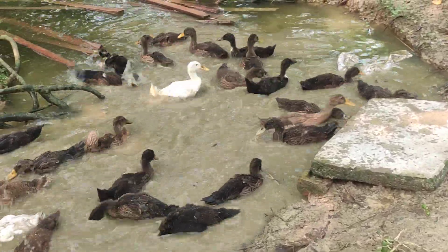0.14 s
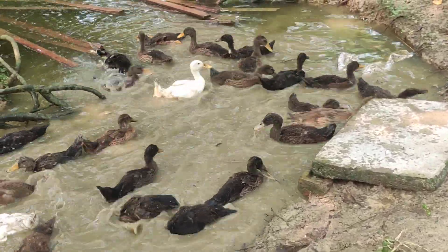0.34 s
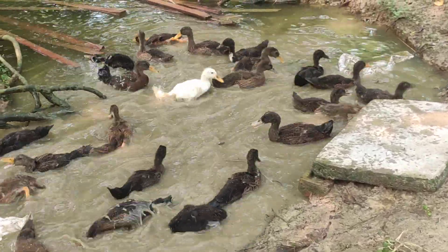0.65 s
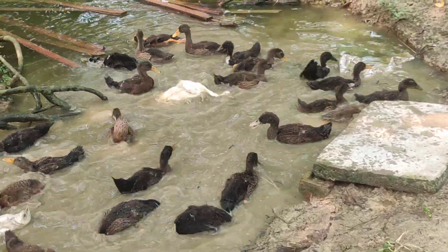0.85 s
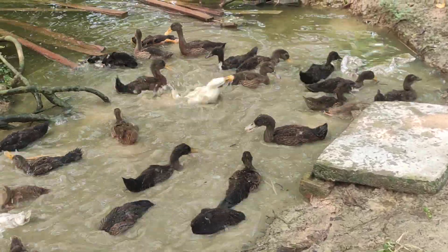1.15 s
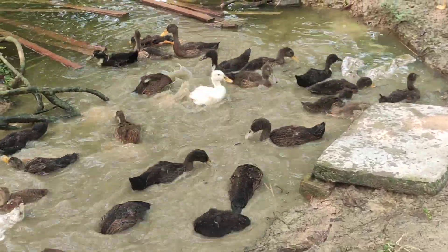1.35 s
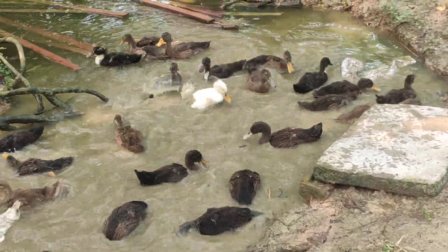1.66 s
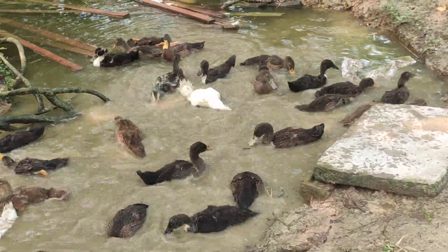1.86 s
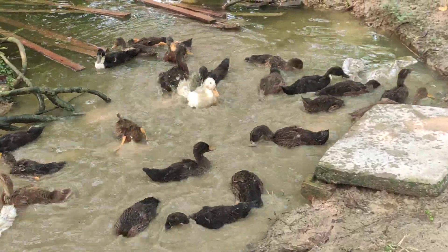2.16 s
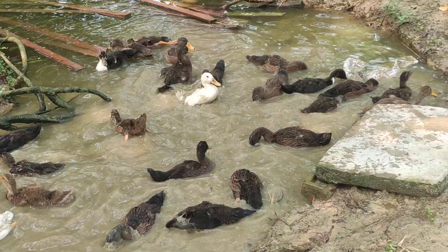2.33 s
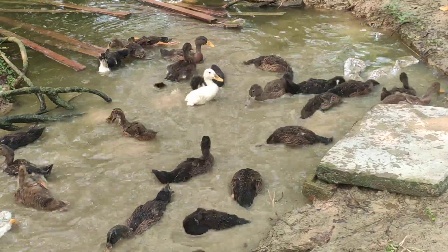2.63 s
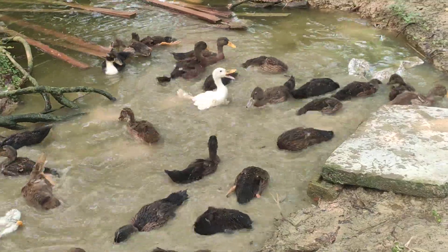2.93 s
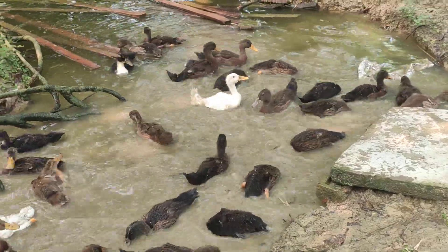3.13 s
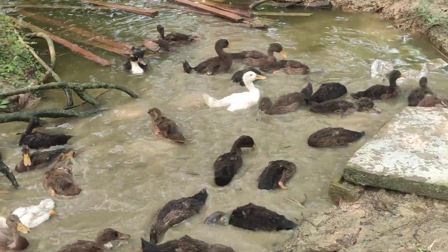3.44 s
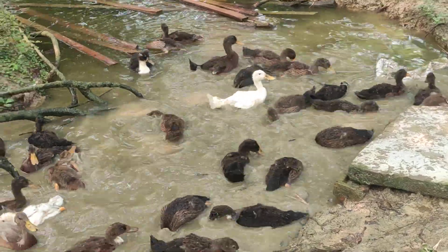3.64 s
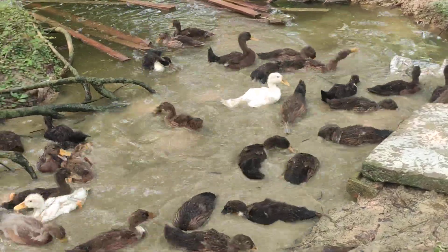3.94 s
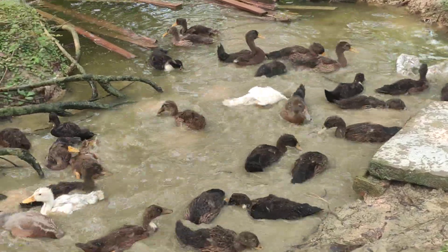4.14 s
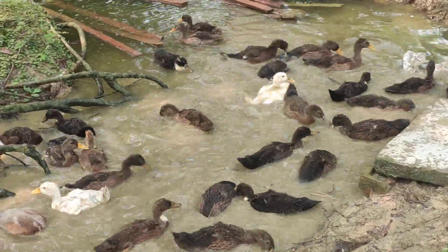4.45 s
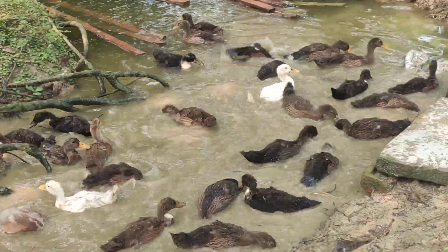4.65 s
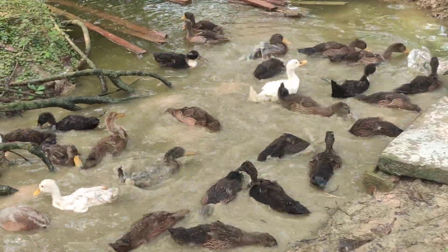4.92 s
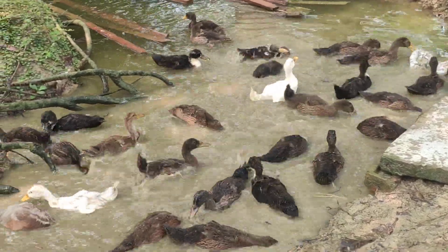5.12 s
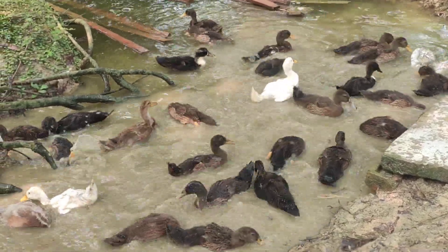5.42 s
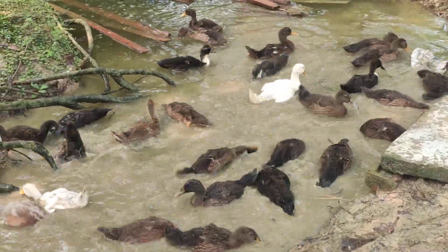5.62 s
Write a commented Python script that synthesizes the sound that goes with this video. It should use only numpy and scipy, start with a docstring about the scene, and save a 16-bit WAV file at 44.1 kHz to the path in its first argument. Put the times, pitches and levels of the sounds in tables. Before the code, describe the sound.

Ducks feed in a shallow muddy stream close to a stereo microphone. From the start, bright droplet ticks and bill clicks, short round plops and gurgles crowd together over a light, fizzy rush of water. A splash comes at 0.1 s, a dense flurry with the sharpest crack around 0.65-1.0 s, a brief lull near 1.2-1.5 s, then strong slaps and deep plops at 1.75-2.4 s. After 3 s the water is calmer, with scattered ticks, small slaps and single bubbles to the end, including a clear plop near 5.7 s. Tiny high peeps of young birds sound at 0.02, 1.4 and 2.7 s, bunch at 3.4-3.9 s, and bend upward and down at 4.3-4.7 s. Far off, a one-cylinder motorbike begins about 1 s, revs, is strongest near 2.1 s, fades around 3 s and swells after 5 s, over low traffic rumble and a faint fading hum. The left channel is brighter and more ringing.

```python
"""A shallow muddy stream where ducks dabble close by: short glides make droplet ticks and bubbles, shaped
noise makes slaps and fizz, curved whistles make young birds' peeps. Far off a one-cylinder motorbike, a stack
of firing orders, revs and drives on over a wavering, slowly fading hum and a low noise rumble.
Two microphone ports lie a hand apart; the left one sits in a cavity that rings in the treble."""
import sys
import numpy as np
from scipy import signal
from scipy.fft import rfft, irfft, next_fast_len
from scipy.io import wavfile
from scipy.ndimage import uniform_filter1d, map_coordinates

SR = 44100
rng = np.random.default_rng(int(sys.argv[2]) if len(sys.argv) > 2 else 0)


def store_pcm(level_fs):
    """Save levels as 16-bit WAV."""
    pcm = np.round(np.clip(level_fs, -1, 1) * 32767).astype(np.int16)
    wavfile.write(sys.argv[1], SR, np.atleast_2d(pcm).T)


N = 254898

# Stirring of the water. Each row: time in seconds, spray level in dB, gurgle level in dB, both before surges.
STIRRING = [(0.0, -51, -45), (0.1, -42, -47.5), (0.3, -45, -47.5), (0.42, -49, -53), (0.6, -46.5, -49),
            (0.7, -43.5, -45.5), (0.95, -43.5, -41.5), (1.15, -49, -52.5), (1.5, -51, -53),
            (1.75, -44, -44), (1.9, -45, -47.5), (2.2, -44.5, -43), (2.33, -44, -44), (2.7, -47, -50.5),
            (3.0, -57, -61.5), (3.3, -50.5, -53), (3.8, -54.5, -57.5), (4.2, -51, -58), (4.7, -53, -57),
            (5.0, -50.5, -57), (5.78, -52, -56)]


def amp(db):
    """Gain of a level in dB."""
    return 10 ** (np.asarray(db) / 20)


def unit(x):
    """x brought to rms 1."""
    return x / np.sqrt(np.mean(x ** 2) + 1e-20)


def along(points, hz):
    """(Hz, value) points interpolated on a log frequency axis."""
    point_hz, value = np.transpose(points)
    return np.interp(np.log(hz + 1), np.log(point_hz + 1), value)


def curves(rows):
    """One value per sample for each column after the time."""
    s, *columns = np.transpose(rows)
    return [np.interp(np.arange(N) / SR, s, column) for column in columns]


def wobble(knots_per_s):
    """A smooth random curve through normal knots."""
    knots = rng.standard_normal(int(N * knots_per_s / SR) + 4)
    return map_coordinates(knots, [np.arange(N) * knots_per_s / SR])


def filtered(x, response):
    """x times a complex response of frequency, zero-padded."""
    m = 2 * next_fast_len(N // 2 + SR // 4)
    return irfft(rfft(x, m) * response(np.fft.rfftfreq(m, 1 / SR)), m)[..., :N]


def causal(db):
    """Minimum-phase response with these gains: it never rings before a hit."""
    cepstrum = irfft(np.log(amp(db)))
    half = len(cepstrum) // 2
    cepstrum[1:half] *= 2  # fold negative time onto positive
    cepstrum[half + 1:] = 0
    return np.exp(rfft(cepstrum))


def pops(s, db, hz, last_hz, ms, late_ms, size):
    """Gliding sines of at most size samples that swell and die, each a little later at the left port."""
    ports = []
    for start_s in (s + late_ms / 1000, s):  # left, right
        index = np.floor(start_s * SR).astype(int)[:, None] + np.arange(size)
        t = np.maximum(index / SR - start_s[:, None], 0)
        u = t / (ms[:, None] / 1000)
        turns = hz[:, None] * t * (1 + (last_hz / hz - 1)[:, None] * u / 2)
        swell = 2.36 * u * np.exp(1 - 2.63 * u)
        wave = amp(db)[:, None] * swell * np.sin(2 * np.pi * turns)
        # samples past the end collect in slot N, cut off
        ports.append(np.bincount(np.clip(index, 0, N).ravel(), wave.ravel(), N + 1)[:N])
    return np.array(ports)


def lesser(table, level_db, hz, ms, count):
    """Columns of a table of loud events, joined by lesser ones at evenly random moments, levels on level_db."""
    s = rng.random(count) * (N - 1) / SR
    loud, tone, long = rng.standard_normal((3, count))
    db = level_db[(s * SR).astype(int)] + 3 * loud
    extra = [s, db, hz * 2 ** np.clip(0.539 * tone, -1, 1), ms * np.exp(0.4 * long)]
    return np.hstack([np.transpose(table), extra])


def distance():
    """Low rumble of far traffic and a wavering hum that slowly fades, nearly alike at both ports."""
    # Each row: frequency in Hz, rms level in dB about which it wavers, as at 3 s.
    hum_tones = [(41.3, -69), (82.4, -61), (207, -70)]
    # Each row: frequency in Hz, relative gain in dB.
    rumble_spectrum = [(12, -22), (20, 6), (83, -1.5), (106, -5.5), (130, -3), (195, -5.5), (372, -14.5),
                       (500, -26), (650, -63), (1100, -120)]
    fade_db_per_s = 0.61
    t = np.arange(N) / SR
    hum = np.zeros(N)
    for hz, db in hum_tones:
        level = np.sqrt(2) * amp(db + 0.38 * wobble(2.05) - fade_db_per_s * (t - 3.0))
        hum += level * np.sin(2 * np.pi * hz * t + 0.5 * wobble(2.86))
    mid, side = filtered(rng.standard_normal((2, N)), lambda hz: amp(along(rumble_spectrum, hz)))
    rumble = unit(np.array([mid + amp(-14) * side, mid - amp(-12) * side]))
    return hum + amp(-54) * rumble


def motorbike():
    """Even firings make a stack of orders, heard past hedges and walls; those near the exhaust note ring out."""
    # Each row: time in seconds, level in dB, favoured exhaust note in Hz.
    level_note = [(.95, -61, 150), (.99, -49, 146), (1.15, -42, 165), (1.35, -47.5, 156), (1.76, -44, 153),
                  (1.97, -44.5, 154), (2.1, -39.5, 151), (2.25, -46, 134), (2.52, -50, 140),
                  (2.8, -49, 142), (3.02, -58, 156), (3.3, -58, 162.4), (3.52, -51.5, 146),
                  (3.9, -55.5, 155), (4.1, -54, 162), (4.61, -59.5, 170), (5.1, -47.5, 173),
                  (5.78, -45.5, 161)]
    # Each row: time in seconds, firings per second.
    firing = [(.95, 16.9), (1.03, 17), (1.15, 24.1), (1.23, 27.8), (1.3, 27.6), (1.49, 23.8), (1.54, 23.3),
              (1.61, 23.7), (2.12, 24.4), (2.4, 25.3), (2.79, 25.5), (3.14, 26.3), (3.91, 26.6),
              (4.64, 28.6), (4.93, 28.7), (5.78, 29.85)]
    # Orders below the exhaust note. Each row: multiple of the firing rate, relative level in dB.
    low_orders = [(1, -19), (2, -11)]
    width_hz, treble_loss_hz = 60, 195
    db, note_hz = curves(level_note)
    firing_hz = curves(firing)[0]
    running = np.arange(N) >= firing[0][0] * SR
    angle = 2 * np.pi * (np.cumsum(firing_hz * running) / SR + 0.422)
    sound = sum(amp(level_db) * np.cos(order * angle) for order, level_db in low_orders)
    for order in range(3, 12):
        hz = order * firing_hz
        resonance = 1j * hz * width_hz / (note_hz ** 2 - hz ** 2 + 1j * hz * width_hz)
        ring = resonance ** 2 / (1 + (hz / treble_loss_hz) ** 8)
        sound += amp(1.4 * wobble(5)) * np.real(ring * np.exp(1j * order * angle))
    return amp(db) * running * sound


def peeps():
    """Each young bird's whistle follows a parabola through three pitches, unsteady in level and pitch."""
    # Each row: start in seconds, length in seconds, first, middle and last Hz, mean level in dB;
    # pitch and level are before flutter.
    whistles = [(0.022, 0.053, 3430, 3550, 3420, -49), (1.332, .035, 2700, 3000, 2800, -58),
                (1.393, 0.037, 3240, 3300, 3380, -49), (2.721, 0.039, 2110, 2330, 2100, -48.5),
                (2.838, 0.049, 2256, 2360, 2190, -53), (3.425, 0.099, 2160, 2630, 2870, -53),
                (3.489, 0.088, 1720, 1705, 1660, -56), (3.496, 0.055, 2020, 2100, 2080, -53),
                (3.552, 0.051, 2120, 2260, 2300, -45), (3.599, 0.032, 2150, 2310, 2440, -51),
                (3.625, 0.041, 1690, 1680, 1660, -53), (3.716, 0.072, 4700, 4860, 4680, -57),
                (3.801, 0.034, 1530, 1946, 2370, -60), (3.894, 0.035, 1700, 2000, 2080, -56),
                (4.309, 0.046, 1896, 3100, 2460, -48), (4.47, 0.054, 1700, 2870, 2620, -55),
                (4.664, 0.059, 1520, 2920, 2540, -49), (4.852, 0.036, 2210, 2420, 2200, -64)]
    out = np.zeros((2, N))
    flutter_db, quaver = 3 * wobble(130), 1 + 0.0193 * wobble(150)
    for s, length_s, first_hz, middle_hz, last_hz, db in whistles:
        u, at = np.linspace(0, 1, round(length_s * SR)), round(s * SR)
        parabola = np.polyfit([0, 0.5, 1], [first_hz, middle_hz, last_hz], deg=2)
        hz = np.polyval(parabola, u) * quaver[at:][:len(u)]
        level = amp(db + flutter_db[at:][:len(u)]) * np.sin(np.pi * u) ** 0.16
        note = level * np.sin(2 * np.pi * np.cumsum(hz) / SR)
        out[0, at + 8:][:len(u)] += note  # left port 8 samples later
        out[1, at:][:len(u)] += note
    return out


def banks(x):
    """The earth banks scatter a short tail back, unlike at the two ports."""
    t = np.arange(SR // 8) / SR
    decay = amp(-60 * t / 0.05) * (t > 0.0015)  # 60 dB in 50 ms, after a 1.5 ms gap
    tail = rng.standard_normal((2, len(t))) * decay
    return signal.fftconvolve(x, tail / np.linalg.norm(tail[0]), axes=1)[:, :N]


def hiss(alike, patchy_db):
    """Water noise with patches of random gain; a share comes from one side, the rest from everywhere."""
    # Each row: frequency in Hz, relative gain in dB.
    fizz_spectrum = [(300, -15), (600, -3.5), (800, -3), (1200, -8), (1600, 2), (3000, 0), (5000, -8.5),
                     (8000, -7.5), (11000, -7.5), (16000, -11)]
    z = signal.stft(rng.standard_normal((3, N)), nperseg=256)[2]
    patches = rng.standard_normal(z.shape[1:])
    patches = uniform_filter1d(uniform_filter1d(patches, 8, 0), 4, 1)
    one, left, right = signal.istft(z * amp(patchy_db * unit(patches)), nperseg=256)[1][:, :N]
    shared = np.array([np.roll(one, shift=9), one])
    pair = np.sqrt(alike) * shared + np.sqrt(1 - alike) * np.array([left, right])
    return unit(filtered(pair, lambda hz: amp(along(fizz_spectrum, hz))))


def swarm(count, hz, octaves, cycles, rise, spread_db, late_ms, size):
    """Countless short gliding pops all over the stream, random in pitch, length, level and place, rms 1."""
    even, bell = rng.random((count, 3)), rng.standard_normal((count, 2))
    pitch_hz = np.clip(hz * 2 ** (octaves * bell[:, 0]), 300, 16000)
    ms = 1000 * cycles * np.exp(0.4 * bell[:, 1]) / pitch_hz
    ms = np.minimum(ms, 300 * size / SR)  # dies within size samples
    db = -spread_db * np.log(even[:, 1] + 0.0014)
    lag_ms = late_ms * (0.36 + 1.41 * even[:, 2])
    return unit(pops(even[:, 0] * N / SR, db, pitch_hz, pitch_hz * rise, ms, lag_ms, size))


def splashing():
    """More stirring makes louder spray, crackle, plips and gurgle over the even rush of the stream."""
    spray_db, gurgle_db = curves(STIRRING)
    surge = amp(2.02 * wobble(9) + 1.7 * wobble(40) + 1.34 * wobble(170))  # drops fall in clumps
    crackle = swarm(count=12000, hz=5570, octaves=0.82, cycles=5.8, rise=1.036,
                    spread_db=2.5, late_ms=0.2225, size=96)
    spatter = swarm(count=2500, hz=8900, octaves=0.51, cycles=1.4, rise=0.91,
                    spread_db=2.5, late_ms=0.234, size=24)
    plips = swarm(count=1200, hz=2632, octaves=0.664, cycles=14.0, rise=1.1,
                  spread_db=2.5, late_ms=0.2, size=400)
    gurgle = swarm(count=2000, hz=916, octaves=0.613, cycles=8.4, rise=1.249,
                   spread_db=1.0, late_ms=0.17, size=700)
    glides = swarm(count=260, hz=799.8, octaves=0.55, cycles=18, rise=1.45,
                   spread_db=2.0, late_ms=0.21, size=4000)
    spray = amp(-5.5) * hiss(alike=0.4, patchy_db=1.5) + amp(-4.0) * crackle
    spray += amp(-10.5) * plips + amp(-10.0) * spatter
    low = amp(-6.5) * gurgle + amp(-12) * glides
    stream = amp(-56.5) * hiss(alike=0.11, patchy_db=4.5)
    return surge * (amp(spray_db) * spray + amp(gurgle_db) * low) + stream


def slaps():
    """Each slap of a bill or wing throws a burst of lumpy spray, sloshes and pushes a low thump."""
    # Each row: start in seconds, spray, slosh and thump level in dB.
    hits = [(0.138, -39.5, -46, -52.5), (0.193, -63, -52, -51.5), (0.665, -55, -44, -75),
            (0.766, -44, -49, -71), (0.84, -43.5, -56, -69), (0.944, -42.5, -45.5, -68),
            (1.047, -59, -53, -54), (1.083, -43.5, -65, -53), (1.501, -65, -53, -44),
            (1.766, -41.5, -48, -47), (1.9, -48, -66, -69), (1.96, -52, -49, -64), (2.036, -40, -42, -44.5),
            (2.071, -35.5, -59, -50), (2.222, -50, -49, -46), (2.353, -47, -51, -44),
            (2.531, -54, -50, -48.5), (3.054, -43.5, -53.5, -48), (3.185, -54, -65, -70),
            (3.27, -45, -49.5, -70), (3.314, -44.5, -48, -53.5), (3.428, -49, -52, -52.5),
            (3.779, -51, -53.5, -52), (3.93, -66, -49, -51.5), (4.18, -46, -61, -75),
            (4.385, -70, -50.5, -70), (4.768, -65, -48, -55), (4.849, -54, -45.5, -66),
            (5.012, -45, -44.5, -69), (5.155, -72, -47, -48), (5.25, -47, -63, -70), (5.366, -67, -48, -58),
            (5.634, -53, -48.5, -65), (5.696, -49, -43.5, -52.5)]
    # Each row of the three spectra: frequency in Hz, relative gain in dB.
    spray_spectrum = [(1500, -39), (2500, 2.5), (8000, 4), (16000, -5.5)]
    slosh_spectrum = [(350, -41), (550, 2), (1000, -5), (2300, -5.5), (3500, -33)]
    thump_spectrum = [(150, -15), (240, 2.5), (400, -6.5), (600, -36)]
    rise_s, fall_s = 0.0015, 0.026
    t = np.arange(SR // 5) / SR
    shape = (1 - np.exp(-t / rise_s)) * np.exp(-(t / fall_s) ** 2)
    swell = np.zeros((3, N + SR))
    for s, *db in hits:
        swell[:, round(s * SR):][:, :len(t)] += amp(np.array(db)[:, None]) * shape
    out = np.zeros((2, N))
    spectra = (spray_spectrum, slosh_spectrum, thump_spectrum)
    for level, spectrum, apart_db in zip(swell[:, :N], spectra, (-3, -12, -14)):
        lumpy = amp(3.0 * wobble(300)) * rng.standard_normal((3, N))
        one, *own = filtered(lumpy, lambda hz: amp(along(spectrum, hz)))
        shared = np.array([np.roll(one, shift=7), one])
        out += level * unit(shared + amp(apart_db) * np.array(own))
    return out


def climbers():
    """Each long bubble is one glide that climbs in pitch as it reaches the surface."""
    # Each row: start in seconds, nominal peak in dB, start pitch in Hz, pitch after the time scale in Hz,
    # time scale in ms.
    long_bubbles = [(.085, -48, 900, 1364, 22), (.29, -47.5, 523, 854, 39), (.435, -43, 1110, 1610, 22),
                    (.53, -45, 556, 750, 21.4), (.785, -43, 850, 1200, 13), (.865, -47, 900, 1195, 22),
                    (.965, -46, 1320, 1760, 25), (1.283, -45, 816, 1280, 14), (2.155, -44, 720, 1495, 30),
                    (2.355, -42, 500, 1000, 13), (2.42, -45, 680, 900, 15), (3.95, -49, 650, 900, 23)]
    s, db, hz, last_hz, ms = np.transpose(long_bubbles)
    return pops(s, db, hz, last_hz, ms, np.full(len(s), 0.14), size=4000)


def bubbles():
    """Large bubbles and plops, rising in pitch; each drags two quieter ones along, higher or lower in pitch."""
    # Each row: start in seconds, nominal peak in dB, start pitch in Hz, time scale in ms.
    loud_bubbles = [(0.028, -35, 1670, 2.5), (0.16, -34.5, 620, 4.4), (0.206, -37, 690, 5.3),
                    (0.243, -44, 636, 7), (0.257, -46, 1140, 9.5), (0.419, -41, 1560, 7),
                    (0.574, -40, 780, 6.6), (0.595, -36, 1470, 2.5), (0.665, -31, 930, 3.6),
                    (0.696, -34, 830, 6.8), (0.768, -32, 1930, 3.1), (0.84, -34, 960, 3.9),
                    (0.887, -41, 1070, 8.8), (0.945, -37, 1560, 3.5), (0.976, -39, 670, 4.6),
                    (1.22, -39.5, 1700, 3.3), (1.496, -40, 820, 11), (1.539, -40.5, 870, 7.6),
                    (1.618, -46.5, 900, 12), (1.659, -39, 1190, 4), (1.715, -40, 1680, 4.5),
                    (1.762, -31.5, 670, 3.8), (1.797, -30, 834, 3.2), (1.816, -39.5, 1080, 8.3),
                    (1.96, -28.5, 664, 3.1), (2.024, -36.5, 760, 8), (2.223, -44, 1570, 6.3),
                    (2.25, -33.5, 1500, 3.4), (2.28, -34, 860, 5.2), (2.305, -45, 1750, 4.2),
                    (2.322, -39.5, 920, 11), (2.341, -34, 617, 3.3), (2.366, -41.5, 513, 31),
                    (2.503, -42, 1000, 10), (2.616, -40.5, 720, 4.8), (2.652, -41.5, 634, 13.5),
                    (2.861, -45.5, 2180, 11), (3.192, -40.5, 1630, 4.4), (3.589, -49, 2270, 9.6),
                    (3.625, -40.5, 620, 5), (3.826, -42, 2230, 6.2), (4.256, -38, 1050, 3.9),
                    (4.381, -42, 1250, 4.5), (4.393, -41.5, 618, 9.8), (4.45, -45, 1460, 8),
                    (4.663, -42, 1670, 4.2), (5.014, -36, 2070, 3.3), (5.167, -46, 735, 18),
                    (5.378, -39, 1610, 7.5), (5.451, -38, 2340, 2.8), (5.696, -42, 1330, 5.9),
                    (5.733, -32.5, 1640, 2.1)]
    lesser_db = curves(STIRRING)[1] + 3.5  # over the gurgle
    s, db, hz, ms = lesser(loud_bubbles, lesser_db, hz=996, ms=7.4, count=40)
    last_hz = 1.06 * hz
    late_ms = np.full(len(s), 0.14)
    out = pops(s, db, hz, last_hz, ms, late_ms, size=2600)
    for _ in range(2):
        when, tone = rng.standard_normal((2, len(s)))
        ratio = 2 ** (0.305 * tone)
        out += pops(s + 0.006 * np.abs(when), db - 7.5, hz * ratio, last_hz * ratio * 1.1,
                    0.78 * ms, late_ms, size=1500)
    return out


def ticks():
    """A droplet or bill makes a bright crack and rings for a moment, amid four random snaps."""
    # Each row: start in seconds, level in dB to which ring, crack and snaps refer, ring pitch in Hz,
    # time scale in ms.
    loud_ticks = [(0.013, -24, 8830, 2.4), (0.0833, -22, 3630, 1.2), (0.1528, -27, 9600, 1.4),
                  (0.373, -35.5, 10500, 5), (0.4204, -28.5, 8800, 0.82), (0.5638, -27, 8700, 0.76),
                  (0.5949, -30, 9200, 0.89), (0.6031, -26.5, 5800, 0.89), (0.6817, -25, 4100, 0.68),
                  (0.7682, -26, 2600, 0.71), (0.842, -33, 7400, 1.4), (0.8598, -17.5, 7300, 0.46),
                  (0.879, -12, 5140, 1.47), (0.9273, -25, 5570, 1.0), (1.084, -29, 8500, 1.3),
                  (1.4518, -31, 8150, 1.7), (1.6118, -32.5, 3000, 2.6), (1.6445, -30.5, 4540, 1.9),
                  (1.6693, -28, 5250, 1.1), (1.7745, -19, 3200, 0.98), (1.9006, -33.5, 3620, 3.6),
                  (1.9094, -30, 4030, 0.99), (2.055, -25, 7500, 1.2), (2.066, -25, 5400, 1.4),
                  (2.0743, -25, 5670, 0.52), (2.0841, -26.5, 3220, 1.3), (2.1749, -27, 5250, 1.5),
                  (2.1976, -32, 9240, 1.2), (2.2406, -23, 6600, 0.66), (2.2951, -27, 7260, 1.4),
                  (2.3021, -33, 4970, 0.79), (2.3694, -33, 2340, 5.7), (2.4117, -22, 7600, 2),
                  (2.467, -24.5, 5440, 1.33), (2.5449, -28, 11000, 0.82), (2.6524, -29, 5400, 1.9),
                  (2.706, -38.5, 3450, 3.9), (2.7255, -31, 4270, 0.9), (2.8231, -36, 5030, 1),
                  (2.8425, -40, 6000, 3.9), (2.889, -27.5, 4040, 0.42), (3.0628, -34, 13400, 0.56),
                  (3.2711, -35, 6750, 1.9), (3.3184, -36, 4220, 1.3), (3.4901, -31, 7550, 0.91),
                  (3.5294, -32, 8800, 0.66), (3.5746, -29.5, 2700, 1.5), (3.6704, -30.5, 9400, 0.9),
                  (3.9405, -29.5, 11200, 0.84), (4.0012, -25, 2620, 0.82), (4.1127, -28, 9000, 1.5),
                  (4.1522, -29.5, 4480, 0.63), (4.1738, -26, 9900, 0.93), (4.3323, -34, 2800, 1.2),
                  (4.4819, -30.5, 2480, 0.71), (4.6305, -31, 3830, 2.25), (4.7281, -29.5, 10960, 1.5),
                  (4.8654, -27, 10240, 0.89), (4.9093, -29, 3240, 2.2), (5.0154, -28.5, 3330, 3.3),
                  (5.373, -34, 2530, 2), (5.4026, -32.5, 10500, 0.51), (5.4605, -32, 7320, 0.71)]
    lesser_db = curves(STIRRING)[0] + 11  # over the spray
    s, db, hz, ms = lesser(loud_ticks, lesser_db, hz=6490, ms=1.4, count=50)
    late_ms = 0.236 + 0.078 * rng.standard_normal(len(s))  # scattered, as the places differ
    out = pops(s, db - 3.0, hz, 1.074 * hz, ms, late_ms, size=300)
    crack_hz = np.full(len(s), 11500)  # sharp crack just after the start: about one bright cycle
    out += pops(s + 0.000214, db - 2, crack_hz, crack_hz, 1100 / crack_hz, late_ms, size=24)
    for _ in range(4):
        when, tone, loud = rng.standard_normal((3, len(s)))
        snap_hz = np.clip(7000 * 2 ** (0.9 * tone), 2000, 15000)
        snap_s = s + 0.0006 * ms * np.abs(when)
        out += pops(snap_s, db - 6 + 3.16 * loud, snap_hz, snap_hz, 1600 / snap_hz, late_ms, size=64)
    return out


def scene():
    """Ducks, young birds and water near by, traffic far off."""
    near = ticks() + bubbles() + climbers() + peeps()
    near += amp(-12) * banks(near)
    return near + slaps() + splashing() + motorbike() + distance()


def record(dry):
    """The left port's cavity colours its channel; nothing is kept above the band limit."""
    # Left port against right. Each row: frequency in Hz, gain in dB.
    left_gain = [(300, 1), (900, 1), (1500, 2.5), (2500, 5.5), (3100, 10), (3750, 15), (4600, 10.5),
                 (5600, 8.5), (6400, 13), (7600, 6.5), (9000, 6.5), (15000, 4)]
    top_hz = 15900
    left = filtered(dry[0], lambda hz: causal(along(left_gain, hz)))
    return filtered(np.array([left, dry[1]]), lambda hz: hz < top_hz)


dry = scene()
out = record(dry)
store_pcm(out)
```